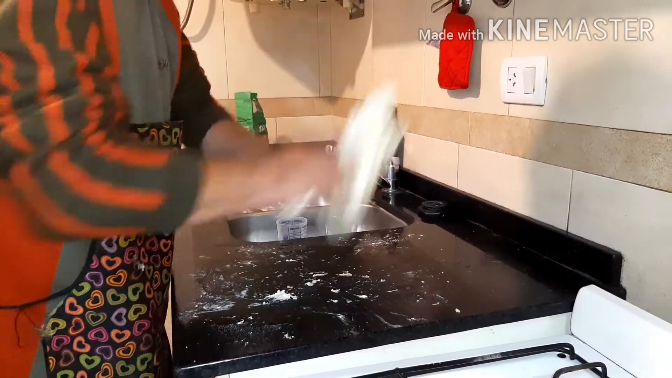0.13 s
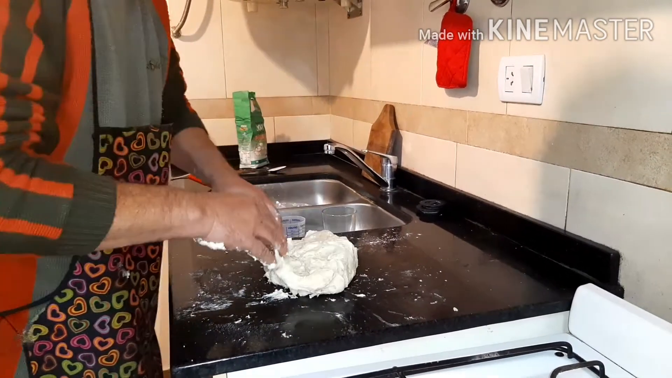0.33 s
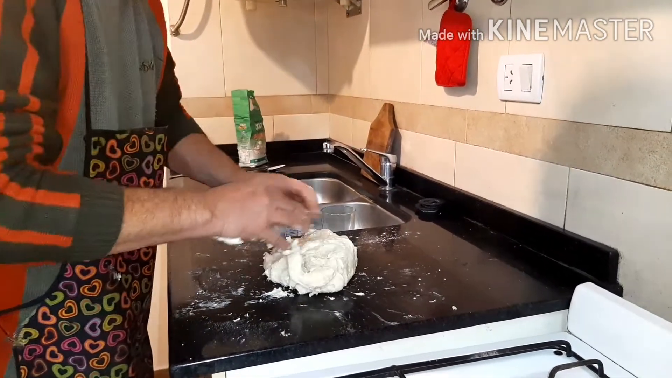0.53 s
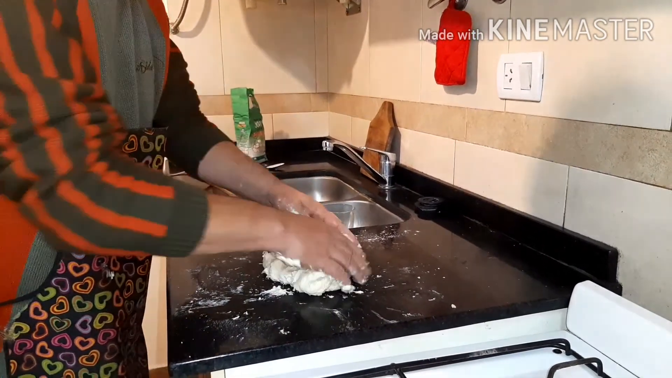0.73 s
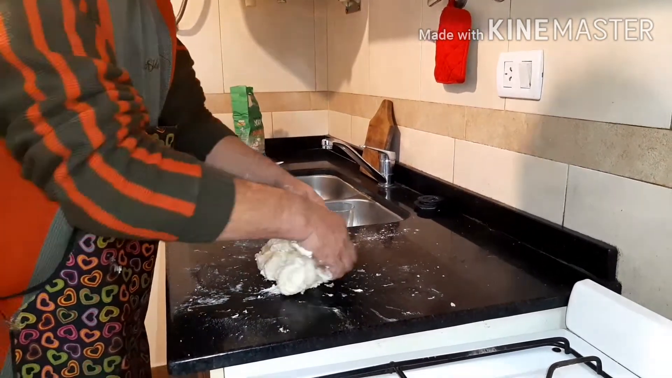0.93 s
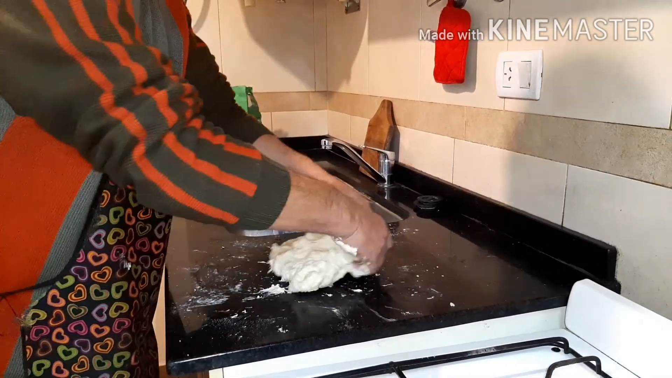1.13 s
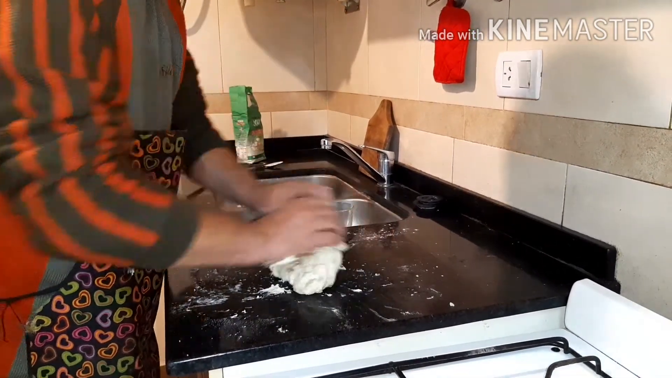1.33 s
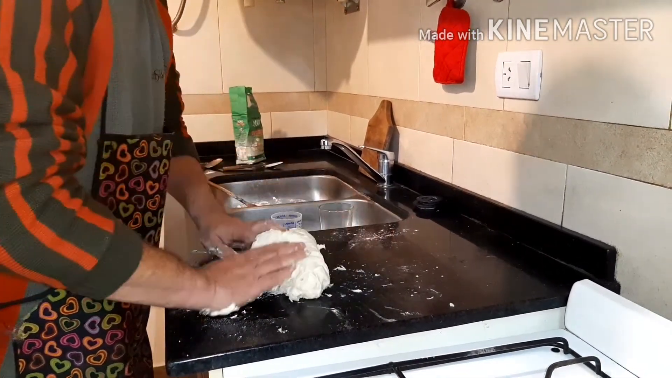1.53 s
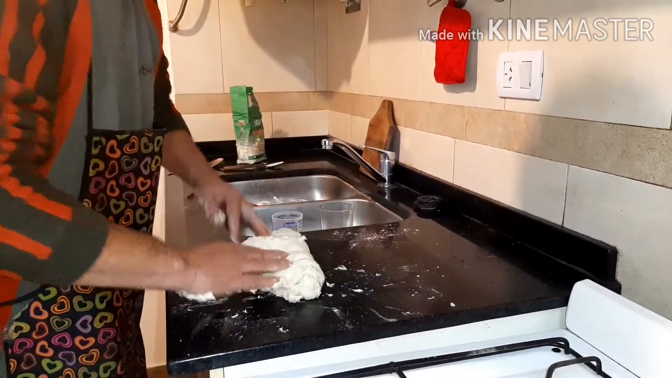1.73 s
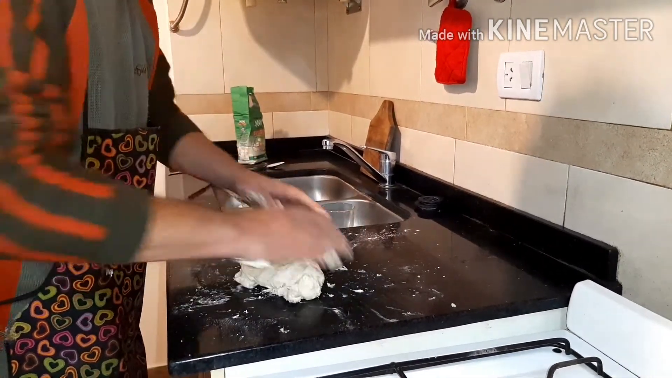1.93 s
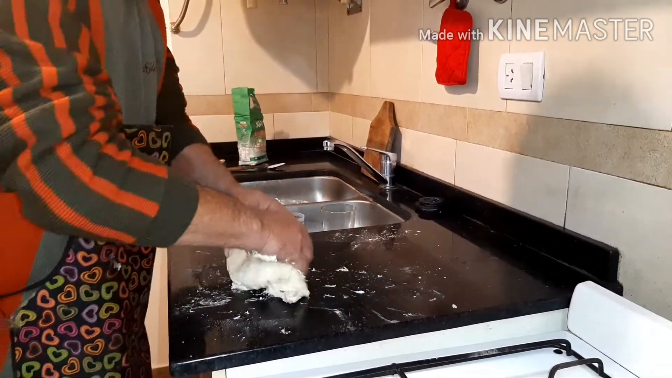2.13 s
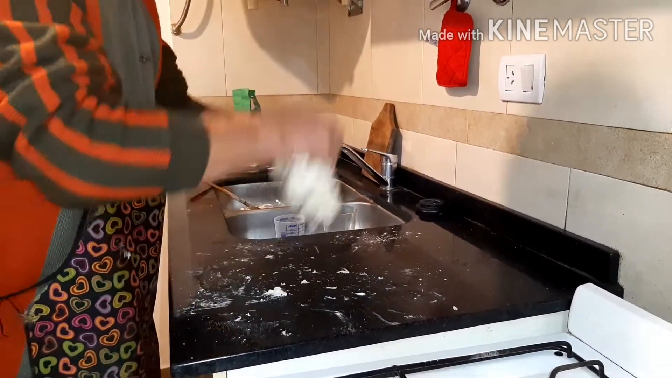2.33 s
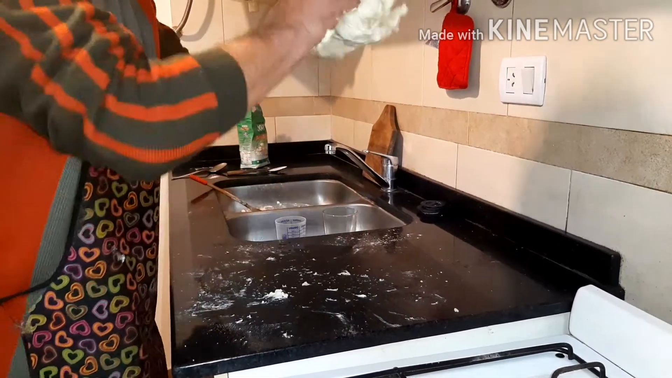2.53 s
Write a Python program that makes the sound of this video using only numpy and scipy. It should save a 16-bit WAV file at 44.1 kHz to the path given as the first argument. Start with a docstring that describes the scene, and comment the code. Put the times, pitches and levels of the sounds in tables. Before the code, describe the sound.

Dough hits a kitchen slab in one very loud, slightly clipped slap almost at the start; a soft folding thud follows, then near quiet, faint rubs and a light pat as it is lifted, in a small reverberant kitchen.

```python
"""In a tiled kitchen, hands brush softly, then a lump of soft dough is slammed onto a stone counter.
Its wet skin cracks, its weight thuds into the slab and the cabinet below, and the room rings briefly.
The dough is then folded, pressed down and picked up again, with dull rubs, lighter thuds and sticky ticks.
Hands and sleeves brush between the blows, over an appliance hum, slowly varying room noise and steady hiss.
Sines make the thuds and hum, filtered noise the rest; decaying noise makes the room, cosines the ringing."""
import sys
import numpy as np
from scipy import signal
from scipy.fft import rfft, irfft
from scipy.io import wavfile
from scipy.ndimage import uniform_filter1d

SR = 44100
rng = np.random.default_rng(int(sys.argv[2]) if len(sys.argv) > 2 else 0)


def transcribe(u):
    """Save the signal u as a 16-bit wav file named by the first command-line argument.

    u: samples, shape (n,) or (channels, n), limited to [-1, 1]; the rate is SR.
    q: integer samples, one column per channel.
    """
    v = np.clip(np.atleast_2d(u).T, -1, 1)
    q = np.round(v * 32767).astype(np.int16)
    wavfile.write(sys.argv[1], SR, q)


N = 114660
T = np.arange(N) / SR  # seconds
FREQ = np.maximum(np.fft.rfftfreq(N, 1 / SR), 1)  # Hz, kept above zero for logarithms


def undb(db):
    """Decibels to amplitude gain."""
    return 10 ** (np.asarray(db) / 20)


def unit(x):
    """Scale to an rms of 1."""
    return x / np.sqrt(np.mean(x ** 2))


def along(points, hz=FREQ, axis=1):
    """Read one column of a table on a log-frequency axis."""
    p = np.array(points, float)
    return np.interp(np.log(hz), np.log(p[:, 0]), p[:, axis])


def shaped(x, gain):
    """Filter by a gain per frequency, without delay."""
    return irfft(rfft(x) * gain, N)


def coloured(x, points):
    """Causal, minimum-phase filter of unit power with the given (Hz, dB) colour."""
    cepstrum = irfft(np.log(unit(undb(along(points)))), N)
    # Folding the cepstrum onto positive times keeps the response from starting early.
    fold = 1 + np.sign(np.fft.fftfreq(N))
    return shaped(x, np.exp(rfft(cepstrum * fold)))


def convolve(x, response):
    """Pass a sound through an impulse response."""
    return signal.fftconvolve(np.atleast_2d(x), np.atleast_2d(response), axes=1)[:, :N]


def pan(db):
    """Left and right gains; a positive level difference leans to the left."""
    return undb(np.array([[db], [-db]]) / 2)


def diffuse():
    """Stereo noise from all around: alike in the bass, nearly unrelated in the treble."""
    # Each row: frequency in Hz, left-right correlation.
    likeness = [(60, 0.86), (250, 0.76), (600, 0.68), (1200, 0.034), (2200, 0.1), (5000, .05),
                (15000, 0.063)]
    c = np.clip(along(likeness), 0, .99)
    mid, side = rng.standard_normal((2, N))
    mid = shaped(mid, np.sqrt((1 + c) / 2))
    side = shaped(side, np.sqrt((1 - c) / 2))
    return mid + side * np.array([[1], [-1]])


def bursts(table):
    """Bell-shaped envelopes of brief contacts."""
    return sum(undb(db) * np.exp(-.5 * ((T - at) * 1000 / ms) ** 2) for at, db, ms in table)


def modes(table):
    """Response of a struck object: each mode is a cosine that dies away exponentially."""
    out = 0
    for hz, db, t60 in table:
        out = out + undb(db) * np.cos(2 * np.pi * hz * T) * np.exp(-np.log(1000) * T / t60)
    return out


def thuds(room):
    """The soft mass swells against the slab and wobbles briefly; slab and cabinet ring on."""
    # Dough and hands landing on the counter.
    # Each row: time in seconds, relative level in dB, pitch in Hz, swell in ms, fade in ms.
    blows = [(0.2141, -14, 383, 1.8, 9.2), (0.2166, -9.5, 163, 3.4, 7.6), (0.2304, -10.5, 121, 2.3, 9.8),
             (0.2303, -12.5, 287, 0.9, 6.5), (0.7105, -32.5, 197, 1.5, 11.5),
             (0.731, -27.5, 101.7, 2.8, 11.8), (0.7297, -35.5, 244, 2.7, 2.3), (0.772, -40, 289.6, 3.6, 21),
             (0.782, -34.5, 127, 4, 4.8), (0.8170, -42, 132, 6, 9.3), (1.045, -55, 331, 8.1, 30),
             (1.7800, -47.5, 147, 12.3, 29), (2.0390, -37.5, 313, 7.1, 9), (2.0432, -27.5, 167.8, 5, 11),
             (2.0760, -38.5, 110, 3.7, 18), (2.239, -52.5, 101, 7.1, 10)]
    # Modes of slab and cabinet. Each row: frequency in Hz, relative level in dB, t60 in seconds.
    counter = [(66, -15, .6), (90.1, -1.5, 0.45), (111.3, -7.5, 0.67), (151.4, -6, 0.19), (174.6, -6, 0.39),
               (237.4, -2.5, 0.48), (272, -4, 0.38), (278.2, -9.5, .4), (335, 2, .36), (381.3, -4, 0.46),
               (467, -9.5, 0.1), (626, -16.5, .31), (630, -16, 0.24), (748, -13.5, 0.39)]
    direct_db, ring_db, room_db, pan_db = -1.5, -52.5, -9.5, 3.5
    push = np.zeros(N)
    for at, db, hz, swell_ms, fade_ms in blows:
        ms = (T - at) * 1000
        swell = -.5 * (np.minimum(ms, 0) / swell_ms) ** 2
        fade = -np.maximum(ms, 0) / fade_ms
        push += undb(db) * np.exp(swell + fade) * np.sin(2 * np.pi * hz * (T - at))
    ring = undb(ring_db) * convolve(push, modes(counter))
    reverb = undb(room_db) * convolve(push, room)
    return (undb(direct_db) * push + ring + reverb) * pan(pan_db)


def smack(room, grain_db=4):
    """Air is squeezed from under the wet dough in one crack and a short crackle; tiles and sink answer."""
    # Wet skin smacking the stone. Each row: time in seconds, relative level in dB, length in ms.
    smacks = [(0.2117, -8, 0.92)]
    # Colour of crack and crackle. Each row: frequency in Hz, relative level in dB.
    smack_colour = [(150, -18), (450, -2), (700, 11.5), (900, -12), (1250, 3.5), (1700, -18), (2300, 8.5),
                    (2850, -4.5), (3400, -12.5), (5200, -20), (6500, -14), (8500, -22.5), (11000, -17),
                    (15000, -10.5)]
    # The smack thrown back by the tiles. Each row: frequency in Hz, relative level in dB.
    echo_colour = [(150, 7.5), (450, 6.5), (700, 3), (900, 0), (1300, 2), (1700, -5.5), (2300, -3),
                   (2850, -5), (3400, -10), (5200, -8.5), (6500, -9.5), (8500, -14), (11000, -12),
                   (15000, -13)]
    # Faint ring of the steel sink. Each row: frequency in Hz, relative level in dB, t60 in seconds.
    sink = [(683, -6, 0.071), (1302, 0.5, 0.27), (1393, -5, 0.33), (2144, 3, 0.37), (2347, -18.5, 0.34),
            (2540, -8, 0.8), (2740, 3, 0.4), (2973, 1.5, 0.31), (3490, 1, 0.16), (5800, -16, 0.13)]
    splat_db, splat_s = -16.5, 0.0157  # air pockets bursting as the dough spreads: level, decay
    echo_db, sink_db, pan_db = 19.5, -32, 1.7
    stereo_weight = 0.6  # weight of stereo noise against centred noise in the crack

    spread, kick = 0, 0
    for at, db, _ in smacks:
        spread = spread + undb(db + splat_db) * (T > at) * np.exp(-np.abs(T - at) / splat_s)
        kick = kick + undb(db) * signal.unit_impulse(N, int(at * SR))
    # The crackle takes a new random level every 32 samples.
    steps = np.repeat(rng.standard_normal(N // 32 + 1), 32)[:N]
    grains = unit(undb(grain_db * steps))
    jet = unit(rng.standard_normal(N) * (1 - stereo_weight) + diffuse() * stereo_weight)
    crackle = diffuse() * spread * grains
    crack = coloured(jet * bursts(smacks) + crackle, smack_colour)
    echo = undb(echo_db) * convolve(coloured(kick, echo_colour), room)
    ring = undb(sink_db) * convolve(kick, modes(sink))
    return (crack + echo + ring) * pan(pan_db)


def squashes(room):
    """Dull, hollow rubs of filtered noise as the dough gives way under a palm."""
    # Palms squashing and shoving. Each row: time in seconds, relative level in dB, length in ms.
    shoves = [(0.738, -47, 14.5), (0.795, -52.5, 12.2), (1.047, -48.5, 12.6), (2.048, -45, 19)]
    # Each row: frequency in Hz, relative level in dB.
    squash_colour = [(100, -17.5), (200, 7), (350, 6), (480, 0.5), (620, -7.5), (820, -3), (1000, -14.5),
                     (1350, -19.5), (2000, -17), (5000, -37.5)]
    room_db, pan_db = -3, 1
    rub = coloured(diffuse() * bursts(shoves), squash_colour)
    return (rub + undb(room_db) * convolve(rub, room)) * pan(pan_db)


def ticks(room):
    """Small sticky contacts, as bright noise bursts, when fingers and dough meet or part."""
    # Each row: time in seconds, relative level in dB, length in ms.
    contacts = [(0.472, -55, 2.9), (1.672, -68.5, 0.5), (2.019, -52, 0.71), (2.0362, -39.5, 0.76),
                (2.043, -51, 3.8)]
    # Each row: frequency in Hz, relative level in dB.
    tick_colour = [(500, -54), (1500, -16), (3000, -4.5), (5000, -7.5), (6800, -3), (8200, -19),
                   (10500, -12.5), (15000, -36)]
    room_db = -1.5
    tick = coloured(diffuse() * bursts(contacts), tick_colour)
    return tick + undb(room_db) * convolve(tick, room)


def brushing(grain_db=2):
    """Slightly grainy swishes that swell and fade with each move of the arms."""
    # Hands over flour, and sleeves. Each row: time of the peak in seconds, level in dB,
    # half length in seconds, treble tilt above 4500 Hz in dB per octave.
    brushes = [(0.072, -63, 0.064, 2), (0.466, -55.5, 0.054, -5.5), (0.747, -64, 0.14, -8),
               (0.864, -62.5, 0.052, 6), (1.017, -72, 0.025, 0), (1.214, -67, .04, 11),
               (1.39, -65.5, 0.042, 8), (1.767, -60.5, 0.073, 5), (2.093, -56, .07, 1),
               (2.255, -56.5, 0.058, 5), (2.547, -56.5, 0.07, -8)]
    # Colour before the tilt. Each row: frequency in Hz, relative level in dB.
    brush_colour = [(1500, 1), (3300, -10.5), (4800, -4), (7000, -8.5), (8700, -11), (12000, -8),
                    (15000, -8.5)]
    flutter = unit(uniform_filter1d(rng.standard_normal(N), size=120))
    noise = diffuse() * unit(undb(grain_db * flutter))
    octaves_up = np.log2(np.maximum(FREQ / 4500, 1))
    out = 0
    for at, db, half_s, tilt_db in brushes:
        gain = undb(along(brush_colour) + tilt_db * octaves_up)
        swell = np.exp(-.5 * ((T - at) / half_s) ** 2)
        out = out + undb(db) * unit(shaped(noise, gain)) * swell
    return out


def background():
    """Rumble and room noise that slowly rise and fall, a steady hiss above, and an appliance hum."""
    # Colour of the room noise. Each row: frequency in Hz, relative level in dB per Hz.
    air_colour = [(25, -39), (45, -8), (70, -3), (95, -6), (135, -5), (175, -18), (300, -15.5), (450, -22),
                  (680, -24), (820, -30), (1100, -28.5), (1600, -34), (2080, -25), (2600, -34),
                  (3400, -43.5), (5900, -46), (6450, -37.5), (6950, -39.5), (9300, -49.5), (10200, -40),
                  (11000, -45), (15000, -44)]
    # Course of the bass. Each row: time in seconds, level in dB before panning.
    rumble_db = [(0, -64.5), (0.3, -48), (1.201, -60), (1.7, -55), (2.2, -50), (2.6, -52.5)]
    # Course of the room noise above the bass. Each row: time in seconds, level in dB before panning.
    air_db = [(0, -58.5), (0.6, -60), (1.2, -63.5), (1.6, -59), (1.95, -56.5), (2.2, -55.5), (2.6, -57.5)]
    # Tones of the appliance. Each row: frequency in Hz, rms level in dB before panning.
    tones = [(70, -57.5), (446.8, -73.5), (845.2, -80), (1389, -85.5), (2083, -78.5), (6395, -85),
             (6546, -87)]
    rumble_to_hz, hiss_from_hz = 160, 3960
    hiss_gain_db, pan_db = -54, 4.5

    air = unit(shaped(diffuse(), undb(along(air_colour))))
    bass = shaped(air, 1 / (1 + (FREQ / rumble_to_hz) ** 6))
    body = shaped(air, 1 / (1 + (FREQ / hiss_from_hz) ** 6))
    hiss = (air - body) * undb(hiss_gain_db)
    swelling = 0
    for noise, curve in ((bass, rumble_db), (body - bass, air_db)):
        level_db = np.interp(T, *np.array(curve).T)
        swelling = swelling + unit(noise) * undb(level_db)
    hum = 0
    for hz, db in tones:
        hum = hum + undb(db) * np.sqrt(2) * np.sin(2 * np.pi * (hz * T + rng.random()))
    return (swelling + hum) * pan(pan_db) + hiss


def kitchen(build_s=0.00077):
    """Response of the tiled room: noise dense almost at once, mostly dying sooner in the treble."""
    # Reverberation. Each row: frequency in Hz, relative level in dB, t60 in seconds.
    reverberation = [(40, -18, 0.69), (102, 3, 0.79), (238, 4, 0.57), (500, 6.5, 0.43), (970, -4, 0.43),
                     (2240, 2, 0.52), (4500, 1, 0.39), (7800, -0.5, 0.26), (14130, -0.5, .24)]
    noise, out = diffuse(), 0
    centres = 2. ** np.arange(5, 15)  # octave bands in Hz, cross-faded into each other
    for hz, share in zip(centres, np.eye(len(centres))):
        t60 = along(reverberation, hz, axis=2)
        gain = np.interp(np.log(FREQ), np.log(centres), share) * undb(along(reverberation))
        # A longer decay starts lower, so that t60 leaves the energy of the band alone.
        start = np.sqrt(2 * np.log(1000) / (t60 * SR))
        out = out + shaped(noise, gain) * np.exp(-np.log(1000) * T / t60) * start
    return out * (1 - np.exp(-T / build_s))


def scene():
    """All sources in one kitchen."""
    room = kitchen()
    return thuds(room) + smack(room) + squashes(room) + ticks(room) + brushing() + background()


def record(dry):
    """The phone's microphone path thins the deep bass, clips peaks at full scale and cuts the top."""
    low_cut_hz, top_hz = 55, 15600
    thin = signal.sosfilt(signal.butter(2, low_cut_hz, "high", fs=SR, output="sos"), dry)
    clipped = np.clip(thin, -1, 1)
    return signal.sosfilt(signal.ellip(10, .2, 80, top_hz, fs=SR, output="sos"), clipped)


dry = scene()
out = record(dry)
transcribe(out)
```